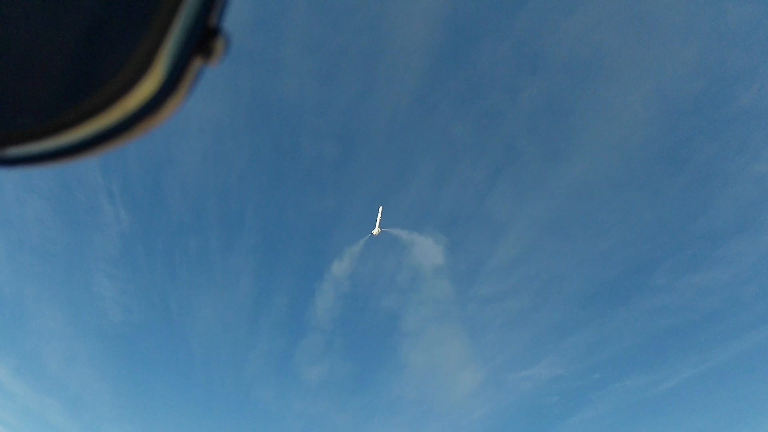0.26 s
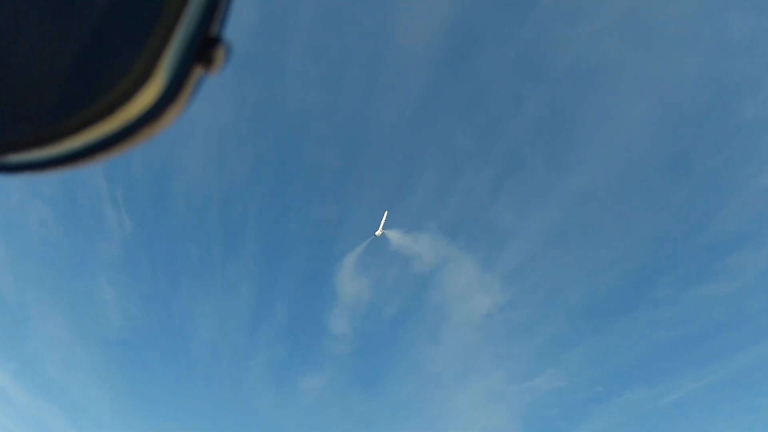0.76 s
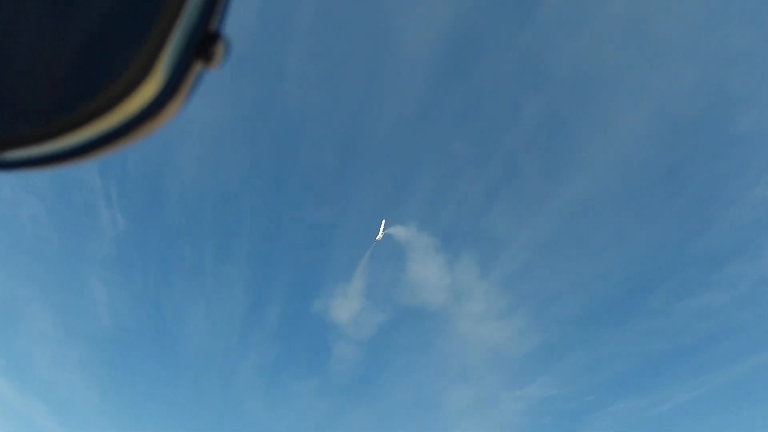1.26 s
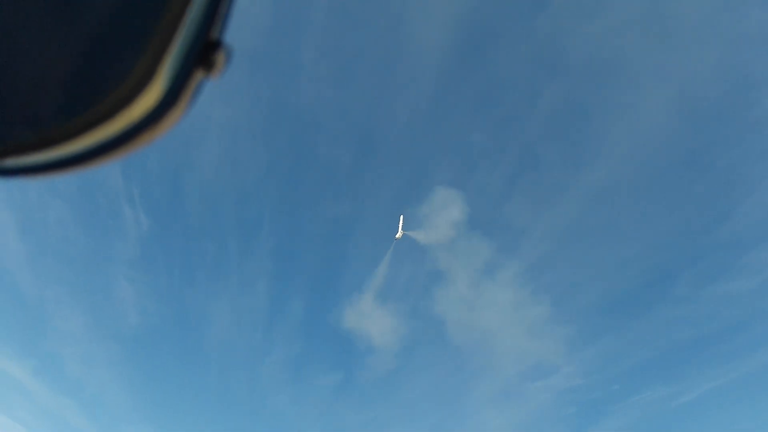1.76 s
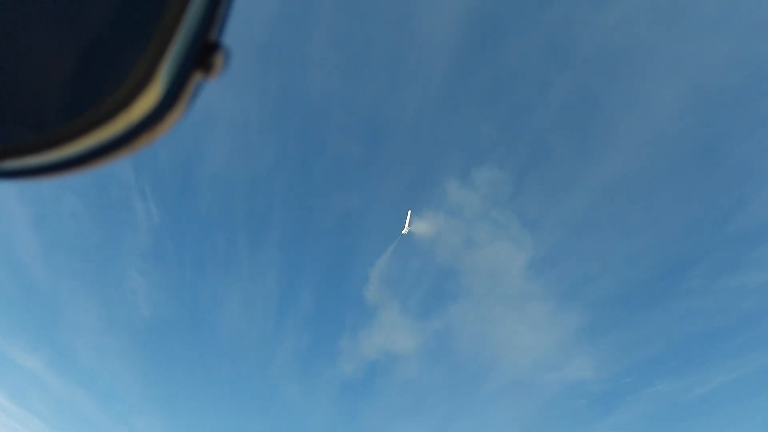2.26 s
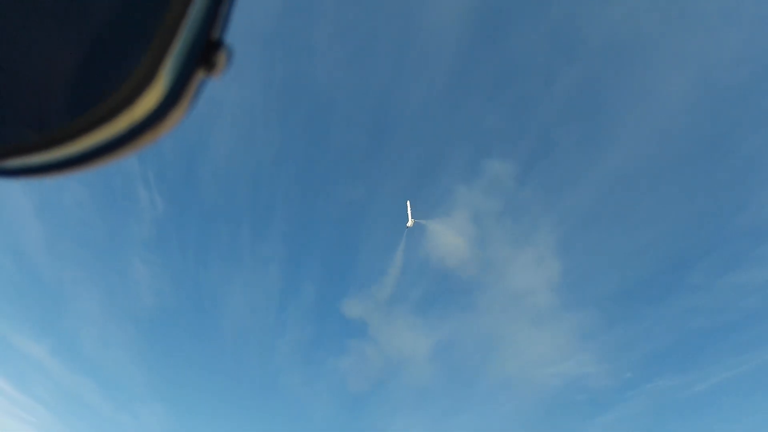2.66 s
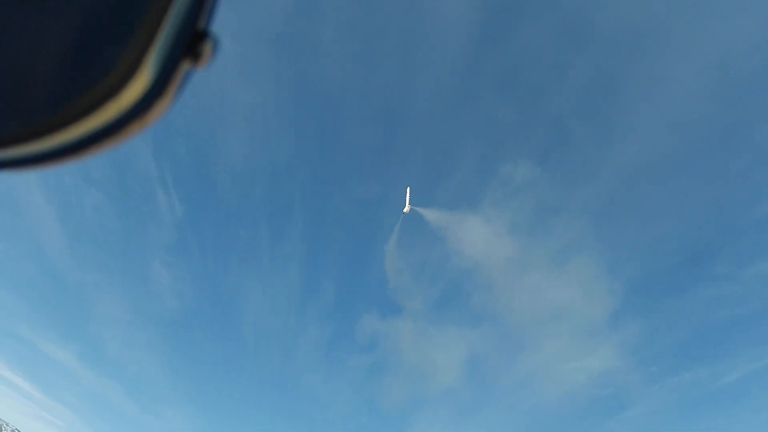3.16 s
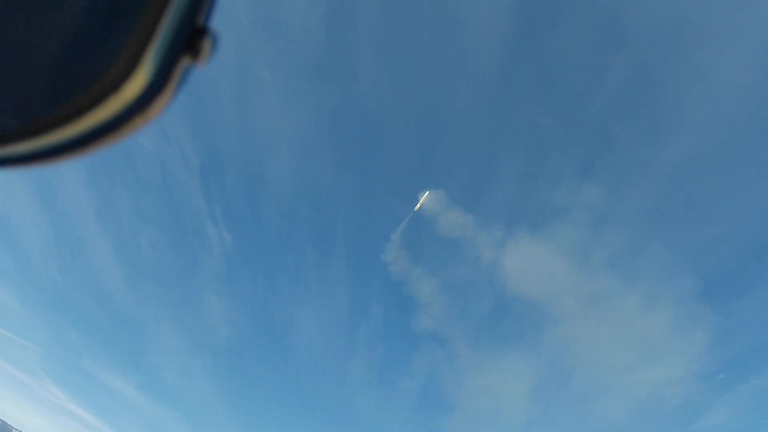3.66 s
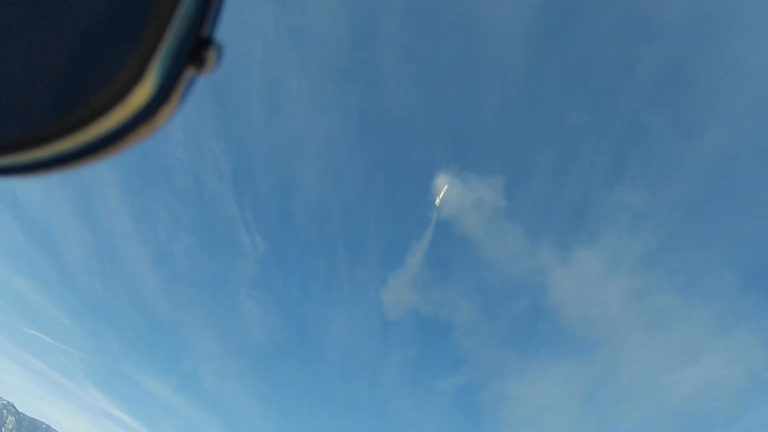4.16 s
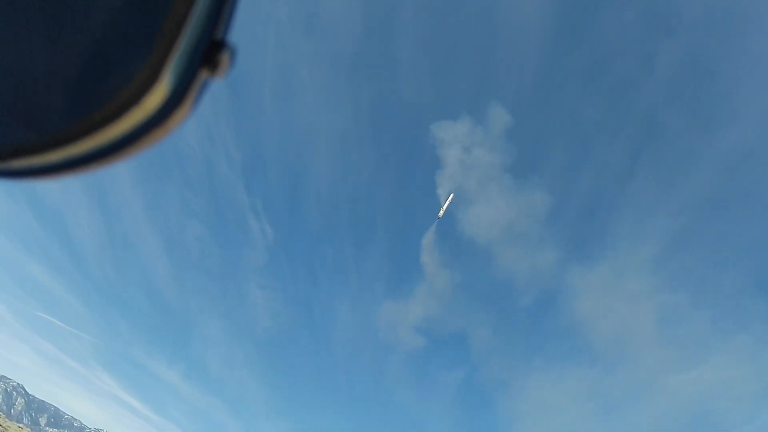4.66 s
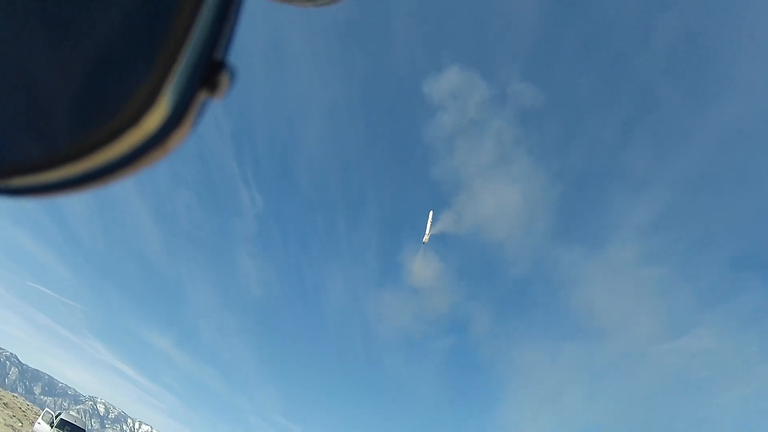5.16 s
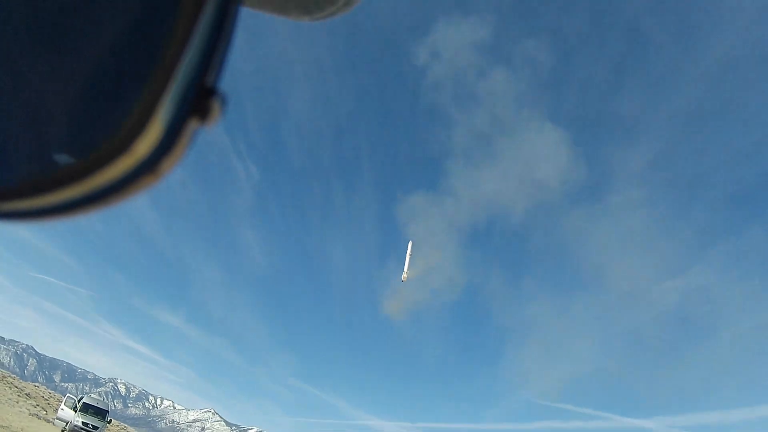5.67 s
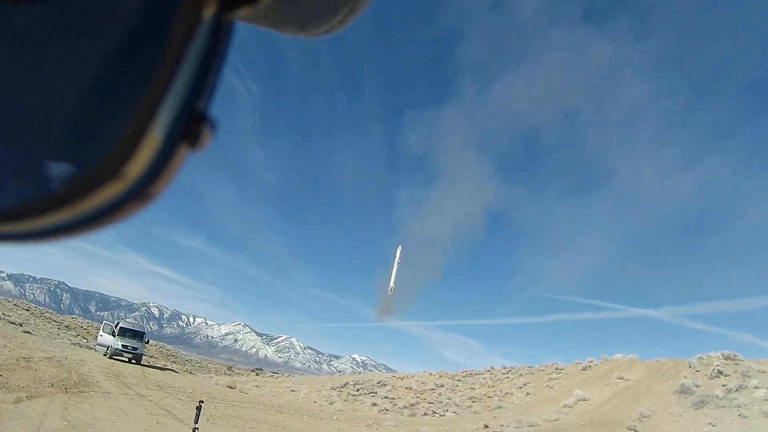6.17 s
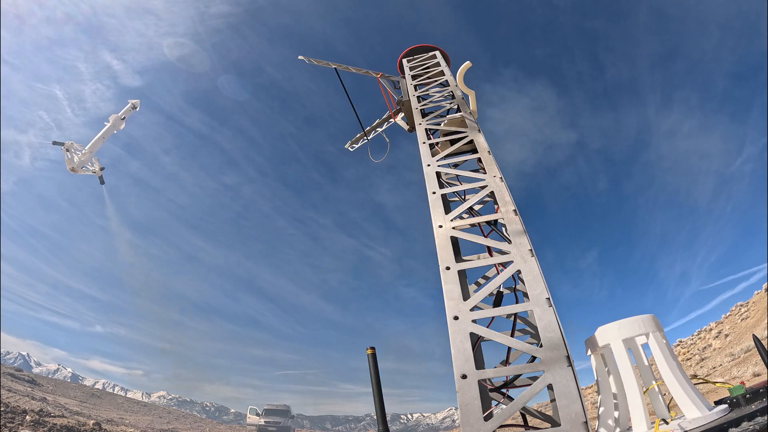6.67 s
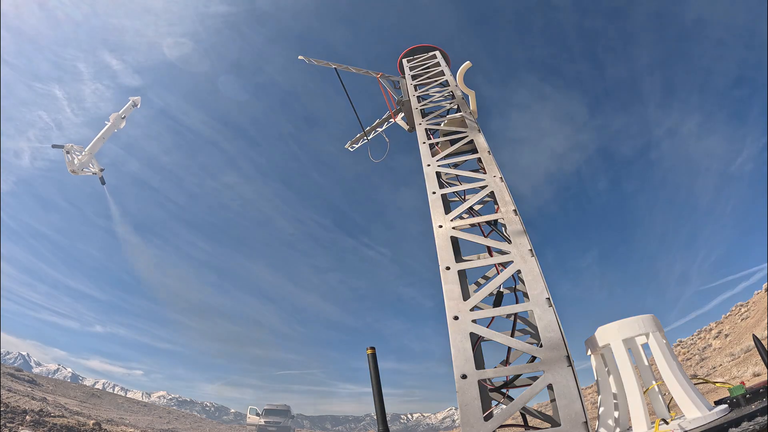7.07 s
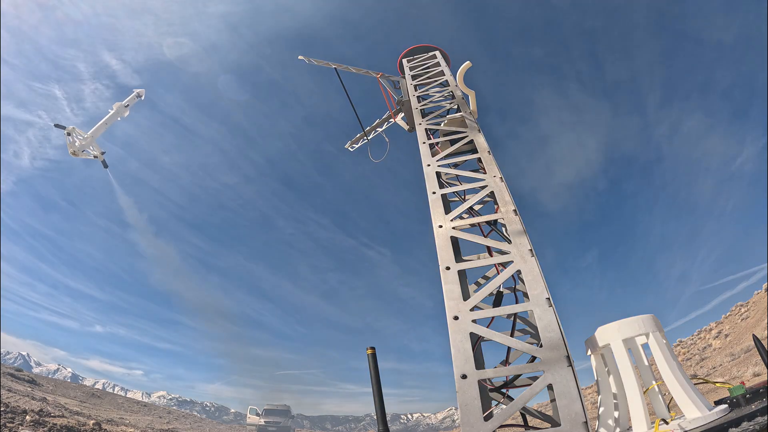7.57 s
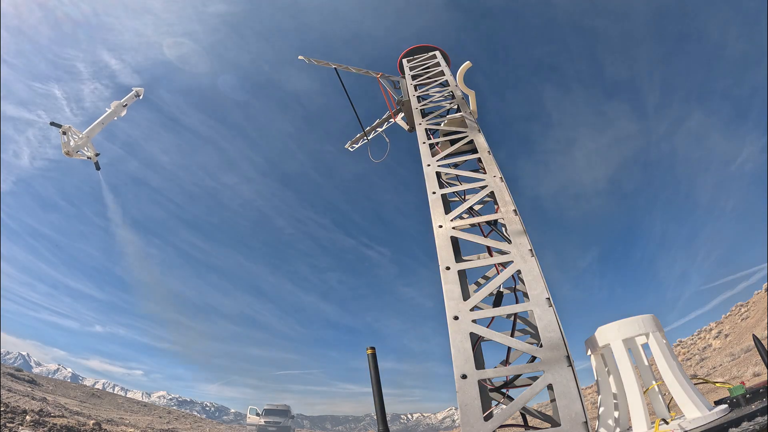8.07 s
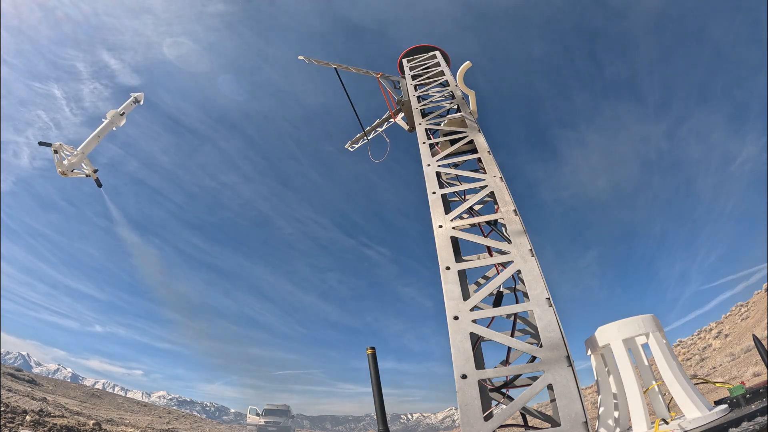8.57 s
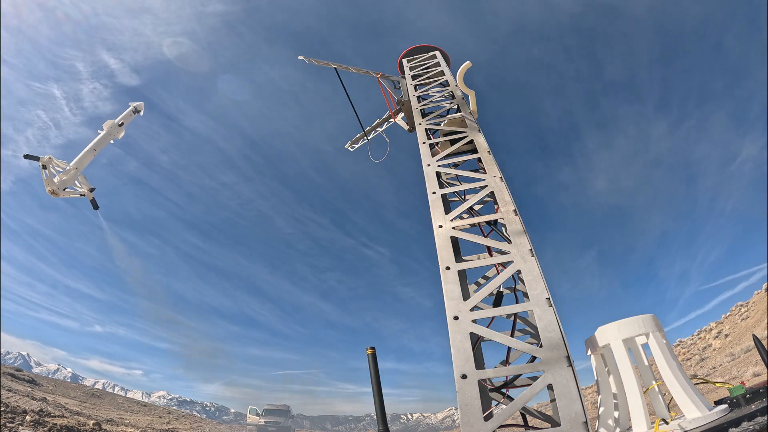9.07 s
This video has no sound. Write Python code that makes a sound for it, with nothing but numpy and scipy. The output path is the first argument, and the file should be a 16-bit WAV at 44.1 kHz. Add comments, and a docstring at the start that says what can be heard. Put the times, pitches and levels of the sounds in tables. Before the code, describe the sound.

Unbroken jet roar outdoors, with nothing else around. At first it is mid-heavy and hissy, moderately wide, with hollow notches and piercing high fizz, fluttering and dipping as the rocket swings. After about six seconds, soft blast thumps overload the microphone; a hard cut brings a fuller, centred sound of low rumble and smooth hiss with slowly sliding comb-like coloration.

```python
"""Over open ground a small rocket descends on its motor, heard by two cameras in turn.
The first, in a housing, hears a thin rush with hollow notches and a shrill top while the rocket swings.
Low thumps of blast close that view; the second, near the ground, hears deep rumble and rippled hiss.
Jet noise is random spectra shaped by bands, cancellations and echoes; thumps are smooth pressure pulses."""
import sys
import numpy as np
from scipy import signal
from scipy.io import wavfile
from scipy.ndimage import uniform_filter1d, minimum_filter1d

SR = 44100
rng = np.random.default_rng(int(sys.argv[2]) if len(sys.argv) > 2 else 0)


def unload_wav(signal):
    """Save mono or channel-first audio to the path in sys.argv[1] as 16-bit WAV at rate SR, clipped to [-1, 1]."""
    wavfile.write(
        sys.argv[1],
        SR,
        np.round(np.clip(np.atleast_2d(signal).T, -1, 1) * 32767).astype(np.int16),
    )


N = 410350
CUT_S = 6.404  # change of camera
SIZE, HOP = 1024, 256  # spectral frame and its step, in samples
HZ = np.fft.rfftfreq(SIZE, 1 / SR)[:, None]
T = np.arange(N // HOP + 5) * HOP / SR  # frame times in seconds


def gain_of(db):
    """Logarithmic level: 20 dB is a factor of ten in amplitude."""
    return 10 ** (np.asarray(db) / 20)


def evened(x):
    """Normalization: scales to a root mean square of 1."""
    return x / np.sqrt(np.mean(abs(x) ** 2) + 1e-20)


def read(points):
    """Logarithmic frequency scale: a table is interpolated along log frequency."""
    hz, value = np.transpose(points)
    return np.interp(np.log(HZ + 1), np.log(hz + 1), value)


def follow(rows):
    """Slow modulation: the columns of a curve table, interpolated at the frame times."""
    seconds, *columns = np.transpose(rows)
    return [np.interp(T, seconds, column) for column in columns]


def bump(hz, width):
    """Gaussian band: a bell around hz."""
    return np.exp(-.5 * ((HZ - hz) / width) ** 2)


def cusp(hz, width):
    """Interference: a Lorentzian peak with wide skirts, the shape of a cancellation in dB."""
    return 1 / (1 + ((HZ - hz) / width) ** 2)


def window(start, end, edge):
    """Gating: 1 between start and end, with straight edges just inside."""
    return np.clip(np.minimum(T - start, end - T) / edge, 0, 1)


def blend(spectra, levels_db):
    """Incoherent addition: powers of normalized spectra add, each on its own level."""
    power = 0
    for spectrum, level_db in zip(spectra, levels_db):
        shape = evened(gain_of(read(spectrum)))
        power = power + (shape * gain_of(level_db)) ** 2
    return np.sqrt(power)


def smoothed_field(field, bins, frames):
    """Correlated fluctuation: averaging over bins and frames, then normalization."""
    across_bins = uniform_filter1d(field, size=bins, axis=0)
    return evened(uniform_filter1d(across_bins, size=frames, axis=1))


def turbulence(patchy_db, flutter_db):
    """Turbulent mixing: two random spectra share small patches and a quick flutter of wide bands."""
    a, b, c, d, patches, flutter = rng.standard_normal((len(T), len(HZ), 6)).T
    patches = smoothed_field(patches, bins=14, frames=12)
    flutter = smoothed_field(flutter, bins=150, frames=3)
    strength = gain_of(patchy_db * patches + flutter_db * flutter)
    return strength * np.array([a + 1j * b, c + 1j * d])


def sound(z):
    """Fourier synthesis by overlap-add; a magnitude of 1 in every bin gives rms 1."""
    waves = signal.istft(z, nperseg=SIZE, noverlap=SIZE - HOP)[1][:, :N]
    return waves / np.sqrt(SIZE * 8 / 3 / 4)


# Spectra of the four jet bands. Each row: frequency in Hz, relative density in dB per Hz.
FAR_RUMBLE = [(15, -21.5), (40, -4), (200, -3.5), (600, -4), (1000, -10), (1600, -27.5)]
FAR_ROAR = [(400, -13.5), (900, -5), (1300, -3.5), (1800, -4.5), (2500, -4.5), (3200, -6), (3800, -8),
            (4400, -11.5), (5200, -40)]
FAR_HISS = [(3800, -53), (4600, -5.5), (5400, -2.5), (6100, -7), (7000, -20), (8000, -24), (9000, -9),
            (10000, -15), (10800, -35)]
FAR_SHRILL = [(9400, -40), (10300, -14), (11500, -8), (13500, -5), (14500, -3.5), (15800, 0), (16200, -60)]
# Jet strength, sagging slowly and snapping back four times. Each row: time in seconds, strength in dB.
FAR_THRUST = [(0, 0), (.55, 0.5), (.7, -4), (.89, -6.5), (.95, 0), (1.3, -1.5), (1.7, 0.5), (2.0, -1.5),
              (2.15, -5), (2.52, -5), (2.6, 0.5), (3.45, -0.5), (3.55, -4.5), (3.9, -5), (4.2, -9),
              (4.3, -3), (4.45, 3), (4.6, 1), (5.28, 0), (5.42, -3), (6.05, -3), (6.12, -6.5), (6.21, -5.5),
              (6.27, 1.5), (6.4, 0)]
# Roar, rumble, hiss, shrill in turn. Each row: level at 0 dB thrust in dB, rise in dB per dB of thrust.
FAR_PARTS = [(-36, 0.87), (-41, 1.02), (-44.5, 1.18), (-34, 0.58)]
# Spells when the balance tips and the image narrows. Each row: start in seconds, end in seconds,
# roar change in dB, rumble change in dB, change of the unshared sound in dB.
TIPS = [(0.673, 0.92, 2, -10, -9), (6.24, 6.45, -0.5, 4, -3)]
# Notches of the housing. Each row: center in Hz, half width in Hz, gain at the center in dB.
NOTCHES = [(4500, 60, -30), (6520, 150, -20), (7400, 130, -11), (8230, 140, -12), (9780, 140, -17)]
# Rises of a brighter band. Each row: start in seconds, end in seconds, from in Hz, to in Hz, boost in dB.
SWEEPS = [(4.28, 4.5, 2900, 3400, 3), (5.78, 6.11, 2150, 3500, 6.5)]
# Short chuffs of the flame. Each row: time in seconds, boost in dB, center in Hz.
PUFFS = [(2.25, 3, 1300), (2.378, 8.5, 1500)]
# Likeness of left and right before narrowing. Each row: frequency in Hz, correlation from 0 to 1.
LIKENESS = [(60, .72), (300, .72), (700, .77), (1400, .81), (3100, .82), (6800, .82), (10000, .82),
            (15000, .9)]
# Phase between the ports. Each row: frequency in Hz, lead of the left port in radians.
PORT_PHASE = [(100, 0), (4000, -.15), (5000, -.05), (9900, 0), (10600, -.55), (15700, -.95)]
TIP_EDGE_S = .03
SWEEP_WIDTH_HZ, SWEEP_EDGE_S = 260, .06


def housed_camera():
    """Jet noise and interference: four bands pass the housing's notches to two partly coherent ports."""
    thrust_db, = follow(FAR_THRUST)
    roar_db, rumble_db, hiss_db, shrill_db = [db + share * thrust_db for db, share in FAR_PARTS]
    width_db = 0 * T
    for start, end, to_roar_db, to_rumble_db, to_width_db in TIPS:
        tipped = window(start, end, TIP_EDGE_S)
        roar_db = roar_db + to_roar_db * tipped
        rumble_db = rumble_db + to_rumble_db * tipped
        width_db = width_db + to_width_db * tipped
    bands = [FAR_ROAR, FAR_RUMBLE, FAR_HISS, FAR_SHRILL]
    colour = blend(bands, [roar_db, rumble_db, hiss_db, shrill_db])

    shape_db = sum(db * cusp(hz, width) for hz, width, db in NOTCHES)
    for start, end, from_hz, to_hz, db in SWEEPS:
        center_hz = np.interp(T, [start, end], [from_hz, to_hz])
        shape_db = shape_db + db * window(start, end, SWEEP_EDGE_S) * bump(center_hz, SWEEP_WIDTH_HZ)
    for s, db, hz in PUFFS:
        puff = np.exp(-.5 * ((T - s) / 0.01) ** 2)
        shape_db = shape_db + db * bump(hz, 700) * puff

    one, other = turbulence(patchy_db=.9, flutter_db=.7)
    likeness = np.clip(read(LIKENESS), 0, 1)
    shared = np.sqrt((1 + likeness) / 2) * one
    unshared = np.sqrt((1 - likeness) / 2) * other * gain_of(width_db)
    half_turn = np.exp(.5j * read(PORT_PHASE))  # each port takes half the phase difference
    ports = np.array([(shared + unshared) * half_turn, (shared - unshared) / half_turn])
    return sound(ports * colour * gain_of(shape_db))


# Blast pushes on the microphone. Each row: time in seconds, peak before gain control in dB,
# length in ms (four standard deviations of the bell; negative for a pull).
THUMPS = [(6.29, -27, 26), (6.315, -37, -28), (6.373, -31, 27)]


def thumps():
    """Pressure pulse: a smooth swell flanked by shallow lobes of opposite sign."""
    t = np.arange(N) / SR
    out = np.zeros(N)
    for s, db, ms in THUMPS:
        u = (t - s) / (ms / 4000)
        pulse = (1 - .4 * u ** 2) * np.exp(-.5 * u ** 2)
        out += np.sign(ms) * gain_of(db) * pulse
    return out


# Spectra of the four bands near the ground. Each row: frequency in Hz, relative density in dB per Hz.
NEAR_RUMBLE = [(7.1, -32), (12, -10), (54, -2.5), (150, -3), (285, -8), (355, -12.5), (500, -15),
               (650, -16.5), (1100, -120)]
NEAR_BODY = [(250, -52), (450, -7), (700, 7), (1100, -4.5), (1400, -1), (1800, 1.5), (2100, -11),
             (2500, -52), (3500, -56)]
NEAR_HISS = [(1500, -12.5), (2350, -5), (2900, -7.5), (3800, -6.5), (4050, -4), (4200, -4.5), (4600, -4),
             (5900, -6), (6200, -5.5), (6700, -7.5), (7600, -8), (9500, -61)]
NEAR_FIZZ = [(6500, -18), (7600, -2.5), (9000, -3), (10500, -5.5), (12000, -11.5), (13500, -20),
             (14500, -30), (15500, -52)]
# Surge of the low end. Each row: time in seconds, rumble change in dB, body change in dB.
NEAR_SURGE = [(6.41, -1, -10), (6.48, -2.5, -4), (6.6, 0, 1.5), (7.1, 0, -5), (7.5, 2.5, -0.5),
              (7.95, -0.5, -7), (8.05, 2, -1), (8.4, 3.5, 0), (8.54, -5.5, -11), (8.64, -5.5, -8),
              (8.8, 1.5, -2.5), (8.93, 3.5, 3), (9.12, 2.5, -0.5), (9.3, -3, -5)]
# Hiss, rumble, body, fizz in turn. Each row: level at the change of camera in dB, trend in dB per second.
NEAR_PARTS = [(-36, -.5), (-38.5, -0.5), (-46, 0), (-42, 0.3)]
# Stretch of the echo paths as the rocket drifts. Each row: time in seconds, stretch as a fraction.
DRIFT = [(6.4, .01), (6.65, -.017), (7.05, -.012), (7.25, 0), (7.62, .066), (8.25, .03), (8.85, -.054),
         (9.31, -.085)]
# Echoes off nearby surfaces. Each row: delay in ms before stretch, share of the direct sound,
# how much of the drift the path follows.
ECHOES = [(.259, .07, 0), (.322, .1, 0), (.414, -.09, 1), (.575, .21, 1), (.621, .07, 1.3), (.667, .05, 1),
          (.771, .09, .6), (.955, .08, 1), (1.075, .14, 1), (1.162, -.09, .6)]
# Narrow hollows, and one slight peak, that slide with the drift. Each row: center in Hz before drift,
# half width in Hz, gain at the center in dB.
HOLLOWS = [(2290, 110, -3), (4250, 67, -2), (6000, 83, 1)]
# Stereo width. Each row: frequency in Hz, side relative to mid in dB.
NEAR_SIDE = [(60, -54), (110, -71), (200, -57), (380, -46), (700, -40), (1290, -45), (2380, -51),
             (4400, -53.5), (8120, -50.5), (15000, -28)]
HISS_PER_BODY = 0.14  # dB of hiss per dB of body surge
HOLLOW_FOLLOWS = 0.66  # share of the drift


def ground_camera():
    """Comb filtering: delayed copies ripple the spectrum of rumble, body, hiss and fizz."""
    rumble_db, body_db = follow(NEAR_SURGE)
    surges_db = [HISS_PER_BODY * body_db, rumble_db, body_db, 0]
    levels_db = []
    for (db, trend_db), surge_db in zip(NEAR_PARTS, surges_db):
        levels_db.append(db + surge_db + trend_db * (T - CUT_S))
    colour = blend([NEAR_HISS, NEAR_RUMBLE, NEAR_BODY, NEAR_FIZZ], levels_db)

    drift, = follow(DRIFT)
    echoes = 0
    for ms, share, moves in ECHOES:
        delay_s = ms / 1000 * (1 + moves * drift)
        echoes = echoes + share * np.exp(-2j * np.pi * HZ * delay_s)
    ripple = np.exp(echoes)  # each echo with its own fainter repeats
    hollow_db = 0
    for hz, width, db in HOLLOWS:
        hollow_db = hollow_db + db * cusp(hz / (1 + HOLLOW_FOLLOWS * drift), width)

    mid, side = turbulence(patchy_db=.8, flutter_db=.7)
    side = side * gain_of(read(NEAR_SIDE))
    stereo = np.array([mid + side, mid - side])
    return sound(stereo * colour * ripple * gain_of(hollow_db))


def scene():
    """Superposition and switching: the first camera with its thumps, then a 2 ms change to the second."""
    second = np.clip((np.arange(N) / SR - CUT_S) / .002 + .5, 0, 1)
    return (1 - second) * (housed_camera() + thumps()) + second * ground_camera()


LIMIT_DB, SQUEEZE = -28, .55  # gain control: threshold, share of the excess removed
EDGE_HZ = 15760  # upper band limit


def record(dry):
    """Compression and band limiting: quick gain control holds down peaks, then a steep low-pass."""
    peak = -minimum_filter1d(-abs(dry).max(0), size=60)  # running maximum of both channels
    over_db = np.maximum(20 * np.log10(peak + 1e-9) - LIMIT_DB, 0)
    smooth_over_db = uniform_filter1d(uniform_filter1d(over_db, size=40), size=30)
    held = dry / gain_of(SQUEEZE * smooth_over_db)
    low_pass = signal.firwin(1023, EDGE_HZ, window=("kaiser", 10), fs=SR)
    return signal.oaconvolve(held, low_pass[None], "same")


dry = scene()
out = record(dry)
unload_wav(out)
```